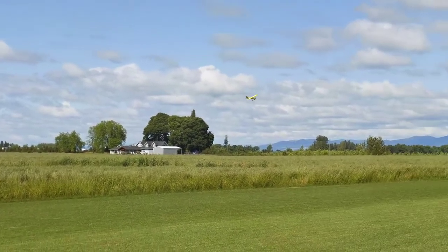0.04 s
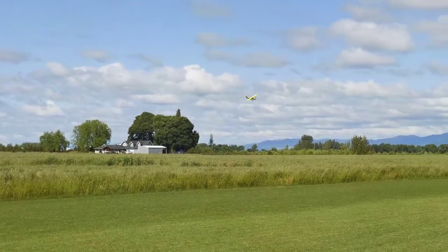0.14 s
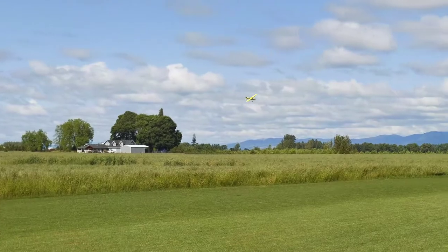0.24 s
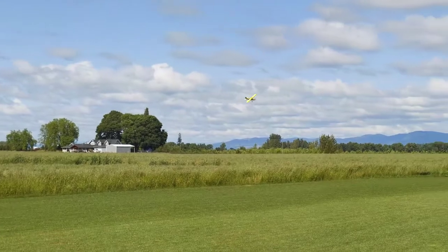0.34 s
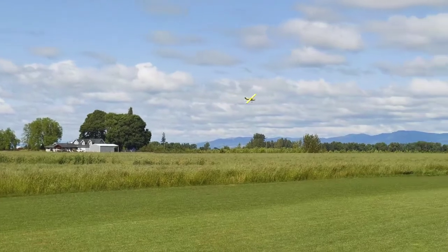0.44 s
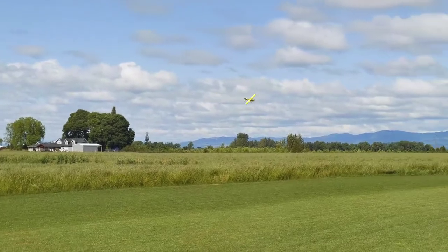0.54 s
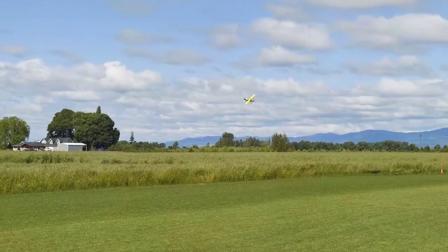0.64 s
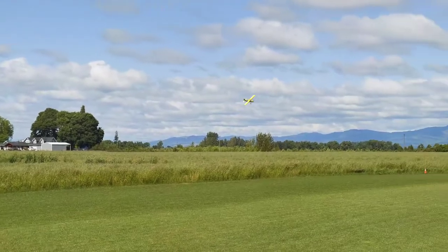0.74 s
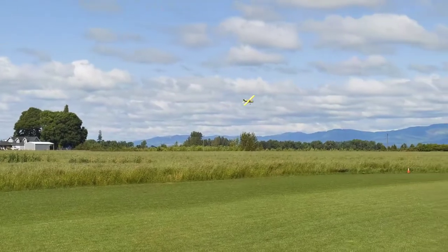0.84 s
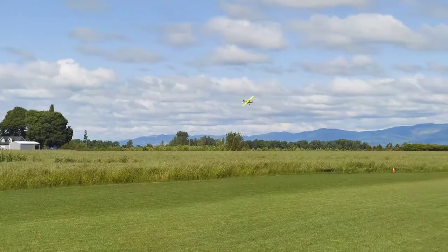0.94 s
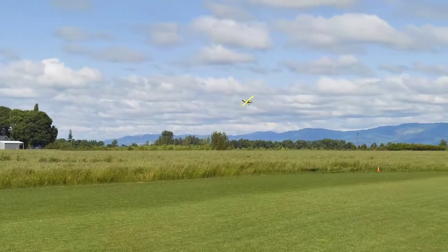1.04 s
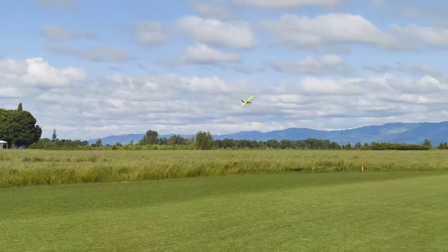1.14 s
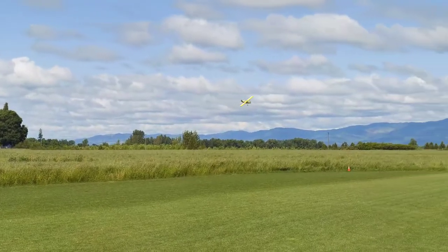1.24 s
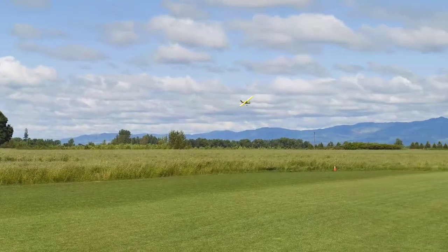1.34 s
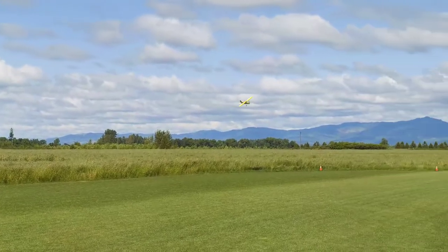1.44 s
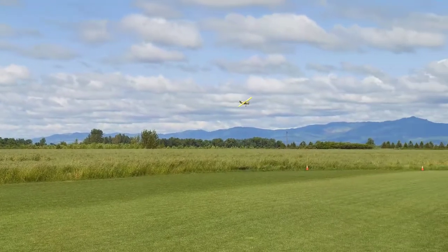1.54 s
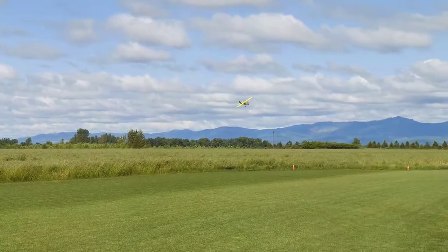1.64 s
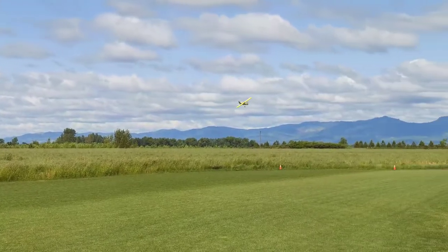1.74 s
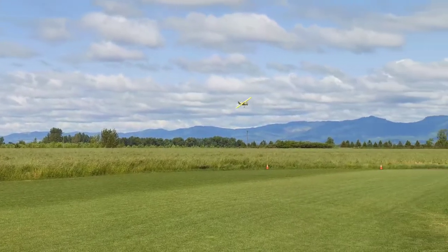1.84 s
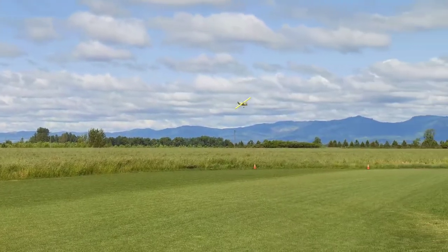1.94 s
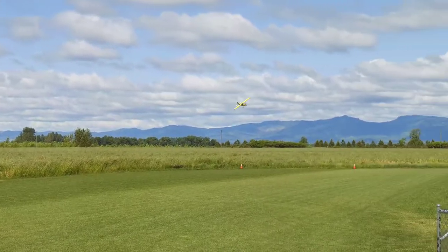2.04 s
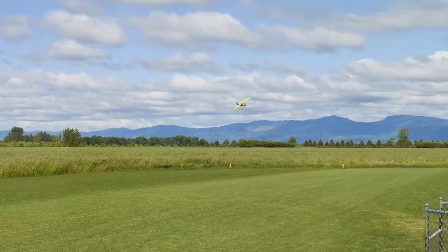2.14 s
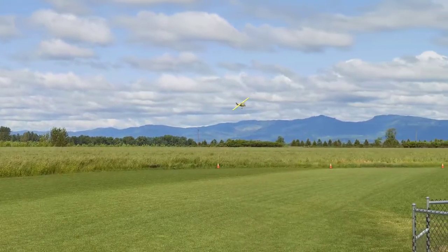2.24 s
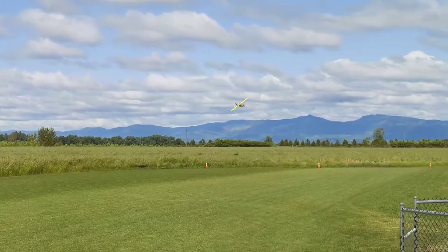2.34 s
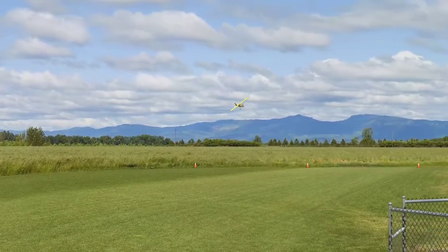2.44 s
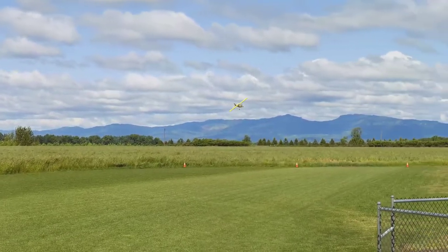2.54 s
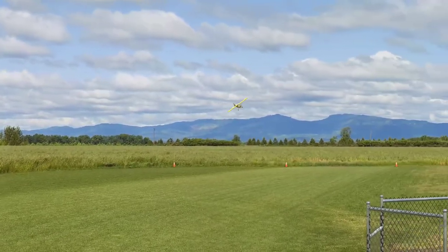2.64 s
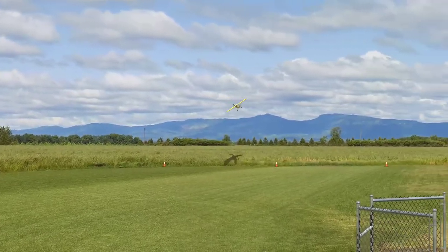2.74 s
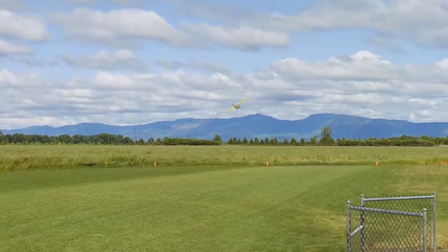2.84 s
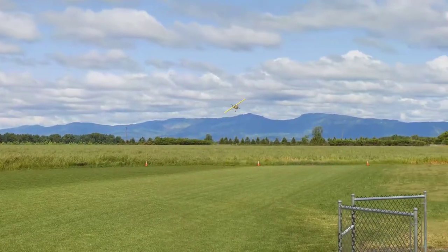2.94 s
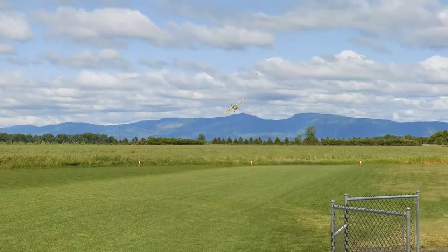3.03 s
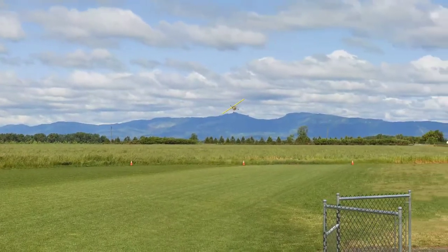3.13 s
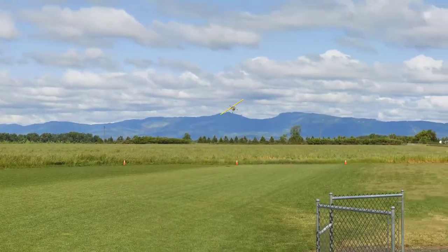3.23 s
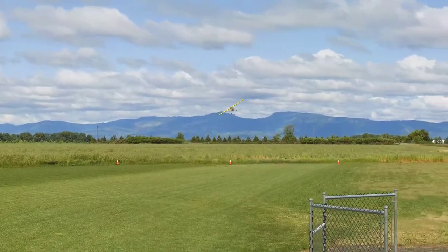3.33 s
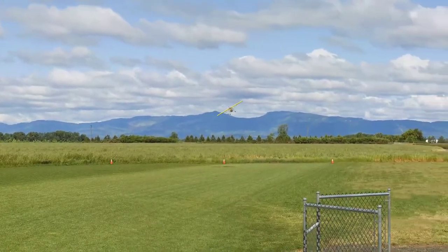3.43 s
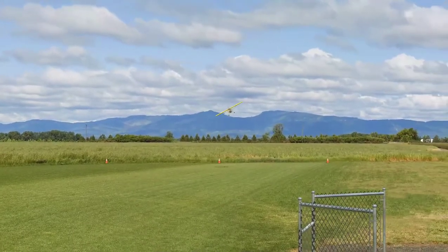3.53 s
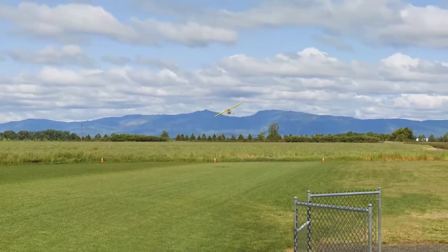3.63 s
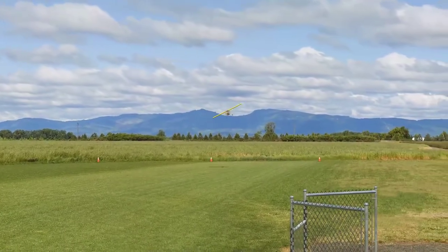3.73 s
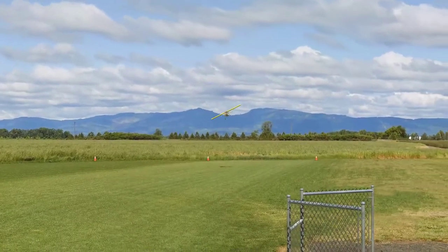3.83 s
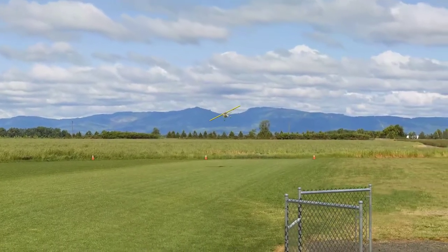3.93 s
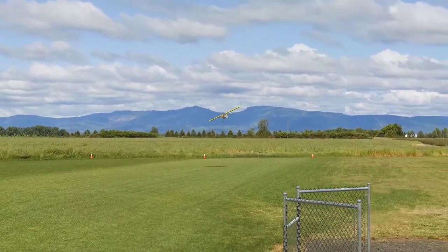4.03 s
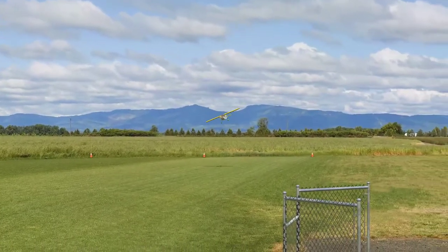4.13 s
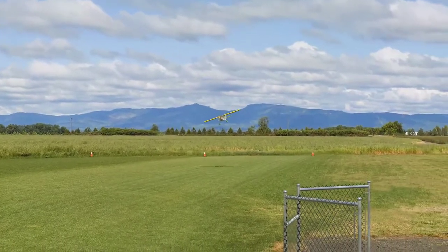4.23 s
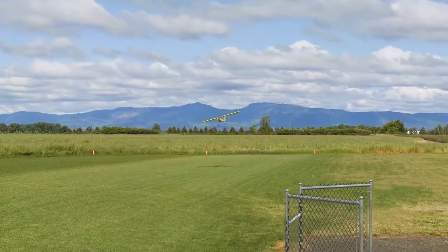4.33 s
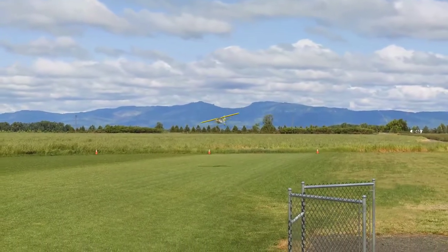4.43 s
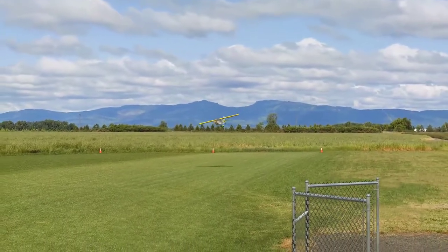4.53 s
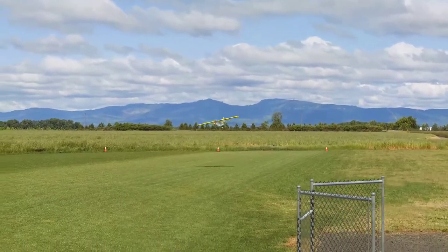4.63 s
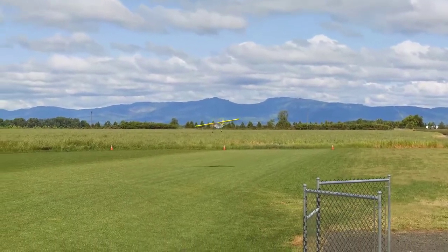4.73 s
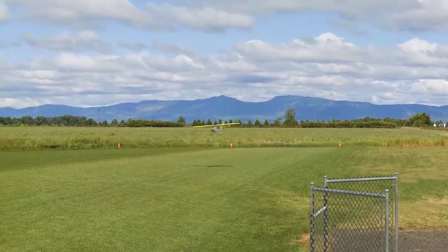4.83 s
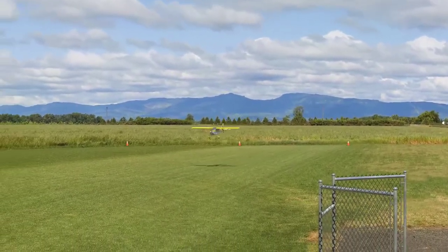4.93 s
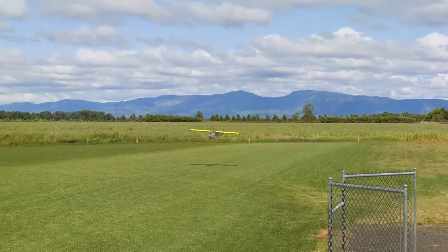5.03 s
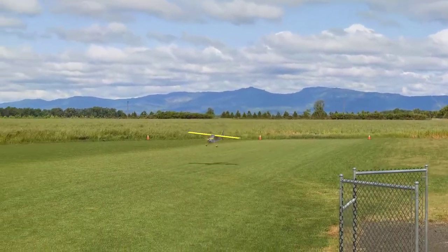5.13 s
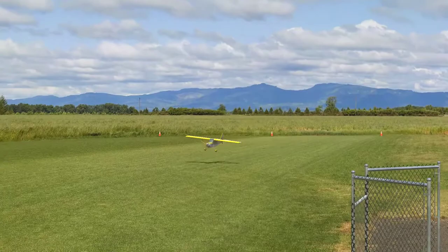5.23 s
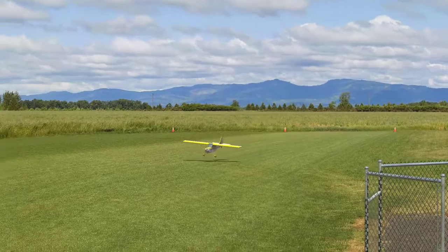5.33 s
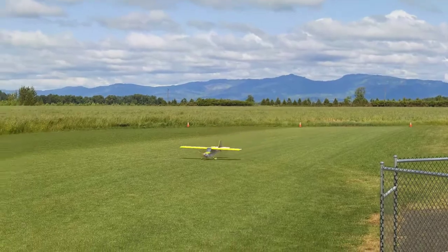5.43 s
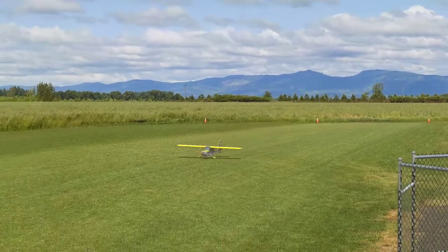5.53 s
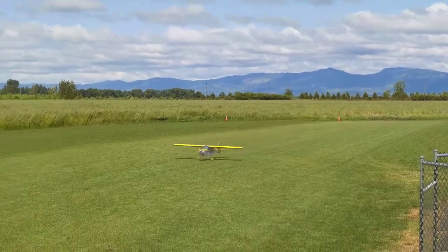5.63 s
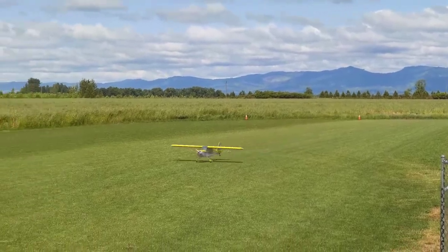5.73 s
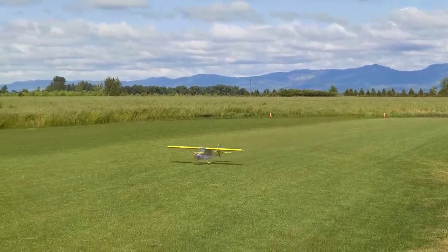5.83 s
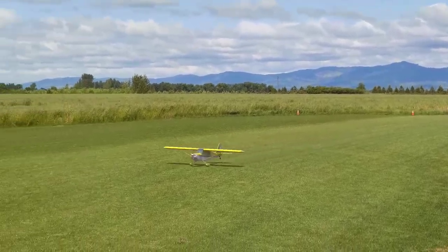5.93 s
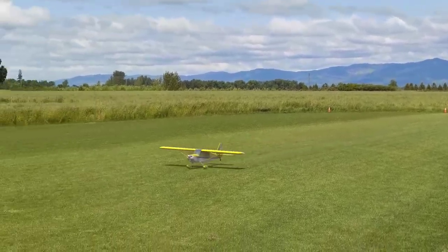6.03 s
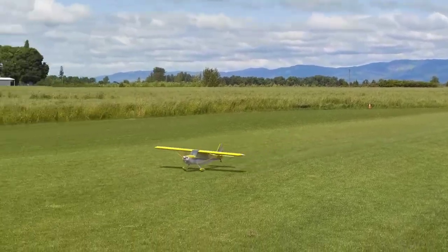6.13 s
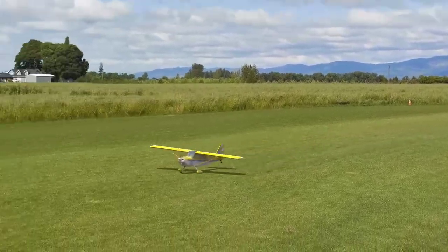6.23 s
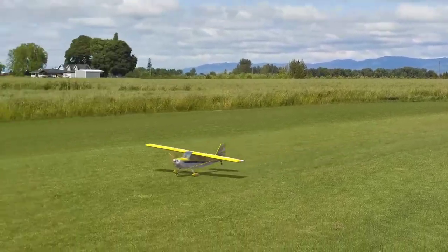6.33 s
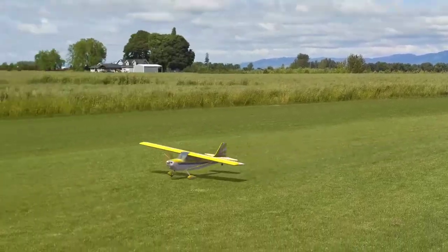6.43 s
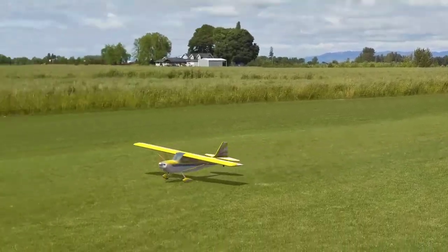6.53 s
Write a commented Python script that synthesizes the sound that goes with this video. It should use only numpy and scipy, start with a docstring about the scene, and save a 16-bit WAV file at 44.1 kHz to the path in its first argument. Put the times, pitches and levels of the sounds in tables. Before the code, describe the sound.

Rapid, hollow exhaust pops with soft intake gulps, faint hiss and ticking valves come from a small plane gliding in to land. The idle sags gently, with weak beats here and there. Near the end it surges abruptly into a firm, bright drone, dips slightly, then rises again as it nears. Open field, light wind, fixed listening position, almost centered sound.

```python
"""A model airplane with a single-cylinder four-stroke engine comes in to land on a grass field in a soft breeze.
First it idles with a throaty putter that slowly slackens; now and then a firing is weak or almost missing.
On touchdown it revs up to taxi closer, and the propeller tones and a rush of air join in.
Exhaust pops, intake gulps, gas hiss and propeller tones all follow the turning crankshaft.
The exhaust levels follow throttle, speed and distance. The field returns a faint echo throughout."""
import sys
import numpy as np
from scipy import signal
from scipy.fft import rfft, irfft, next_fast_len
from scipy.io import wavfile
from scipy.ndimage import uniform_filter1d, map_coordinates

SR = 44100
rng = np.random.default_rng(int(sys.argv[2]) if len(sys.argv) > 2 else 0)


def dump(signal):
    """Clip the signal to [-1, 1] and save it as 16-bit WAV at the path in sys.argv[1]."""
    limited = np.clip(np.atleast_2d(signal).T, -1, 1)
    pcm = np.round(limited * 32767).astype(np.int16)
    wavfile.write(sys.argv[1], SR, pcm)


N = 289716

# Tone colour of escaping gas and of the ticking valves. Each row: frequency in Hz, relative level in dB.
HISS_COLOUR = [(400, -25), (1000, 4), (1650, -0.5), (2000, -7.5), (2500, -1.5), (3200, -6.5), (4300, -2),
               (7000, -8), (9500, -10.5), (11000, -18), (13500, -22.5), (15800, -33)]
# Tone colour of moving air. Each row: frequency in Hz, relative level in dB.
AIR_COLOUR = [(25, -12), (55, -11), (90, 2.5), (160, 9.5), (400, -2), (800, -30), (2000, -46.5),
              (7000, -48.5), (10000, -55), (15000, -76)]


def amp(db):
    """Turn decibels into a gain."""
    return 10 ** (np.asarray(db) / 20)


def unit(x):
    """Scale to an rms of 1."""
    return x / np.sqrt(np.mean(x ** 2) + 1e-20)


def along(points, hz):
    """Read a value between (Hz, value) points on a logarithmic frequency axis."""
    point_hz, values = np.transpose(points)
    return np.interp(np.log(hz + 1), np.log(point_hz + 1), values)


def curves(rows):
    """Join the points of each column after the time into a curve with one value per sample."""
    seconds, *columns = np.transpose(rows)
    return [np.interp(np.arange(N) / SR, seconds, column) for column in columns]


def wobble(rate):
    """Draw a smooth random curve through this many random points a second."""
    points = rng.standard_normal(int(N * rate / SR) + 4)
    return map_coordinates(points, [np.arange(N) * rate / SR])


def filtered(x, response):
    """Multiply the spectrum of x by a function of frequency."""
    size = next_fast_len(N + SR // 2)
    hz = np.fft.rfftfreq(size, 1 / SR)
    return irfft(rfft(x, size) * response(hz), size)[..., :N]


def noise(colour):
    """Make random noise of rms 1 with this tone colour."""
    return unit(filtered(rng.standard_normal(N), lambda hz: amp(along(colour, hz))))


def ringing(colour, size=4096):
    """Make a ring with this tone colour that starts at once and dies away (minimum phase)."""
    cepstrum = irfft(np.log(amp(along(colour, np.fft.rfftfreq(size, 1 / SR)))))
    # folding the second half onto the first leaves nothing before the strike
    cepstrum[1:size // 2] *= 2
    cepstrum[size // 2 + 1:] = 0
    return irfft(np.exp(rfft(cepstrum)))


def strike(at, sizes, response):
    """Sound a response of energy 1 at each given sample, scaled by its size."""
    pulses = np.bincount(at, sizes, N)
    return signal.fftconvolve(pulses, response / np.linalg.norm(response))[:N]


def fade_db(fade):
    """Dip smoothly and briefly in level, following a bell curve."""
    middle_s, half_length_s, depth_db = fade
    return depth_db * np.exp(-((np.arange(N) / SR - middle_s) / half_length_s) ** 2)


def breeze():
    """Soft moving air, a noise whose level wanders gently."""
    return amp(-35 + wobble(3.4)) * noise(AIR_COLOUR)


def propeller_wash(throttle):
    """Turbulent air behind the propeller, a noise that grows with the throttle."""
    return amp(-32) * throttle * noise(AIR_COLOUR)


def field(x, echo_s, echo_db):
    """One distant echo and a little diffuse scatter, dulled by the grass, join the direct sound."""
    # How long scattered sound lasts. Each row: frequency in Hz, time to fall by 60 dB in seconds.
    fall_times = [(150, 0.31), (1000, 0.12), (8000, 0.085)]
    scatter_db, absorb_hz = -18, 900
    hz, t, bands = signal.stft(rng.standard_normal(SR // 2), SR, nperseg=256)
    decay = amp(-60 * t / along(fall_times, hz)[:, None])
    tail = signal.istft(bands * decay, SR, nperseg=256)[1]
    scatter = signal.fftconvolve(x, tail / np.linalg.norm(tail))[:N]
    dull_scatter = filtered(scatter, lambda f: 1 / (1 + 1j * f / absorb_hz))
    echo = np.pad(x, (int(abs(echo_s) * SR), 0))[:N]
    return x + amp(echo_db) * echo + amp(scatter_db) * dull_scatter


def crank(rate, flutter):
    """Count engine cycles by adding up the speed; each whole number is an exhaust stroke."""
    # Moments when the beat jumps ahead. Each row: time in seconds, jump as a share of a cycle.
    jumps = [(1.42, .33), (2.37, .25), (3.56, .25), (4.77, .23)]
    start = .072  # cycles
    ahead = sum(share * (np.arange(N) / SR > s) for s, share in jumps)
    smooth_ahead = uniform_filter1d(ahead, size=1800)
    return start + np.cumsum(rate) / SR + smooth_ahead + flutter * wobble(14)


def propeller(cycle, throttle, lag, growth):
    """Clean low tones at multiples of the shaft speed; they swell steeply with the throttle."""
    # Peak levels in dB at full throttle, of the tones at 1 and 2 times the shaft speed.
    tone_levels = [-12.5, -28]
    # One brief dip of the lower tone: middle in seconds, half length in seconds, depth in dB.
    low_tone_fade = (6.31, 0.077, -16)
    shaft_db, blade_db = tone_levels
    angle = 4 * np.pi * (cycle - lag)  # the shaft turns twice per engine cycle
    shaft_tone = amp(shaft_db + fade_db(low_tone_fade)) * np.cos(angle)
    blade_tone = amp(blade_db) * np.cos(2 * angle)
    return throttle ** growth * (shaft_tone + blade_tone)


def level_db(law, rate, throttle):
    """A layer's level follows throttle, nearness and idle speed, and how hard the engine pulls to speed up."""
    # The airplane flies off, turns and comes in. Each row: time in seconds, distance in metres.
    distances = [(0, 45.5), (1.6, 60.4), (2.4, 55.5), (3.9, 30.3), (5.2, 26.6), (5.8, 22.5), (6.57, 13.3)]
    reference_m, idle_rate = 30, 40  # metres, firings per second
    pull_rate = 69  # speeding up this fast, in firings per second each second, is a hard pull
    idle_db, power_db, near_db, speed_db, pull_db = law
    nearness = np.log2(reference_m / curves(distances)[0])
    speeding_up = uniform_filter1d(np.gradient(rate) * SR, size=3500)
    pull = np.tanh(speeding_up / pull_rate)
    idle = idle_db + speed_db * np.log2(rate / idle_rate)
    return (1 - throttle) * idle + throttle * power_db + near_db * nearness + pull_db * pull


def clatter():
    """Loose valve gear: uneven ticks at random times set off bursts of noise that die away and overlap."""
    # In order: ticks per second, level in dB against the hiss bursts, spread in dB, decay time in seconds.
    ticking = (42.5, -11, 4.5, 0.32)
    per_s, level, spread_db, decay_s = ticking
    ticks = (rng.random(N) < per_s / SR) * amp(spread_db * rng.standard_normal(N))
    gate = signal.lfilter([1], [1, -np.exp(-1 / (decay_s * SR))], ticks)
    return amp(level) * unit(gate) * noise(HISS_COLOUR)


def gas_jet(cycle, rate, throttle, lead_s, rise_s, repeat):
    """Hiss bursts out as the exhaust valve cracks open; under load each burst is partly like the last."""
    blowdown_s = .0021
    age_s = (cycle + lead_s * rate) % 1 / rate  # time since the valve opened
    gate = (1 - np.exp(-age_s / rise_s)) ** 3 * np.exp(-age_s / blowdown_s)
    same_share = np.clip(repeat * throttle, 0, 1)
    # reading the same noise from its start in every cycle makes the bursts alike
    rasp = np.interp(age_s * SR, np.arange(N), noise(HISS_COLOUR))
    mixed_hiss = np.sqrt(1 - same_share) * noise(HISS_COLOUR) + np.sqrt(same_share) * rasp
    burst = unit(gate / np.sqrt(rate)) * mixed_hiss
    leak_db = -15.75 * (1 - throttle) - 8.25 * throttle  # steady hiss at idle and at full throttle
    return burst, amp(leak_db) * noise(HISS_COLOUR)


def intake(at, sizes, rate):
    """Part of a cycle after each idle pop the cylinder draws air: a short, rounded gulp."""
    gulp_hz, width_s, gulp_db = 190.4, 0.0056, -3.5
    after_pop, delay_s = .27, .015  # share of a cycle, then seconds to the middle of the gulp
    t = np.arange(SR // 16) / SR - delay_s
    gulp = -np.exp(-(t / width_s) ** 2) * np.cos(2 * np.pi * gulp_hz * t)
    gulp_at = at + (after_pop * SR / rate[at]).astype(int)
    return strike(gulp_at, sizes * amp(gulp_db), gulp)


def firings(cycle, throttle, idle_scatter_db, power_scatter_db):
    """Find the sample and strength in dB of each firing; burning is uneven at idle and firm under load."""
    # Weak or nearly missed firings. Each row: time in seconds, change of strength in dB.
    misfires = [(.592, -6), (.637, -8), (.681, -5), (.934, -9), (1.051, -8), (2.123, -7), (2.531, -5),
                (2.711, -11), (2.814, -13), (3.024, -5), (3.265, -6), (3.7, -6), (3.891, -11), (4.001, -13),
                (4.222, -6), (5.134, -11)]
    at = np.flatnonzero(np.diff(np.floor(cycle)) > 0)
    scatter_db = idle_scatter_db * (1 - throttle[at]) + power_scatter_db * throttle[at]
    strength_db = rng.standard_normal(len(at)) * scatter_db
    for s, drop_db in misfires:
        nearest = np.argmin(abs(at / SR - s))
        strength_db[nearest] += drop_db
    return at, strength_db


def muffler_pop(start_hz, end_hz, fall_s, rise_s, decay_s):
    """One idle pop: the muffler's ring sinks in pitch as the burst of gas drains away."""
    t = np.arange(SR // 16) / SR
    hz = end_hz + (start_hz - end_hz) * np.exp(-(t / fall_s) ** 2)
    swell = (1 - np.exp(-t / rise_s)) ** 2 * np.exp(-t / decay_s)
    return swell * np.sin(2 * np.pi * np.cumsum(hz) / SR)


def idle_crack(at, sizes):
    """The pipe's ring after each idle firing, its resonances drifting together in pitch."""
    # Tone colour of the ring. Each row: frequency in Hz, relative level in dB.
    ring_colour = [(300, 1.5), (500, -4), (680, 7.5), (830, -7), (1000, 4.5), (1200, -11.5), (1620, -2.5),
                   (1950, -21), (2450, -9.5), (3100, -19.5), (4300, -11.5), (8000, -52), (14000, -66.5)]
    # Drift of the pitch. Each row: time in seconds, pitch ratio.
    pitch_drift = [(0, 1), (1.4, 0.98), (2.3, .88), (3, 1.01), (5.2, 0.99)]
    # the ring is played back along a clock that runs faster or slower
    clock = np.cumsum(curves(pitch_drift)[0])
    starts = np.minimum(clock[at].astype(int), N - 1)
    return np.interp(clock, np.arange(N), strike(starts, sizes, ringing(ring_colour)))


def pipe(x):
    """In the pipe the lows trail the highs by a few of their own cycles, so every crack sweeps downward."""
    sweep = 3.5  # each frequency is late by sweep / (hz + 400) seconds
    return filtered(x, lambda hz: np.exp(-2j * np.pi * sweep * np.log(hz + 400)))


def exhaust(cycle, rate, throttle):
    """Each firing booms in the muffler, cracks in the pipe and puffs hiss; at idle the intake answers."""
    # Level rules for boom, crack and gas hiss, before the trims below. Each lists: idle level in dB,
    # full throttle level in dB, dB per halving of distance, dB per octave of idle speed, dB for a hard pull.
    boom_law = (-28, -19, 3, -2.5, 0.5)
    crack_law = (-52.5, -34, 6, 17.5, 1.2)
    gas_law = (-59, -45, 7.5, -1, 2)
    # Tone colours of boom and crack under load. Each row: frequency in Hz, relative level in dB.
    power_boom_colour = [(40, -61.5), (90, -22.5), (170, -1), (255, 4.5), (340, 0), (425, 0.5), (550, -6.5),
                         (700, -10), (800, -19), (950, -46), (1500, -67.5), (6000, -98.5)]
    power_crack_colour = [(500, -27.5), (800, -5), (1020, 6.5), (1300, -2.5), (1720, 0.5), (1900, -11),
                          (2130, -12), (2340, 1), (2580, -3), (2950, -27), (3600, -21), (4500, -15),
                          (9000, -20.5), (15000, -57)]
    # One brief dip of the boom while taxiing: middle in seconds, half length in seconds, depth in dB.
    boom_fade = (5.66, 0.17, -4.5)
    boom_db, crack_db, hiss_db = [level_db(law, rate, throttle) for law in (boom_law, crack_law, gas_law)]
    at, db = firings(cycle, throttle, idle_scatter_db=1.4, power_scatter_db=.35)
    spacing = np.sqrt(SR / rate[at])  # evens out the loudness at any firing rate
    idle = spacing * np.sqrt(1 - throttle[at])
    power = spacing * np.sqrt(throttle[at])

    pop = muffler_pop(start_hz=408.6, end_hz=141.7, fall_s=0.00735, rise_s=0.17, decay_s=0.0039)
    # a weak firing loses more of its crack than of its boom
    putter = strike(at, idle * amp(0.83 * db), pop) + intake(at, idle, rate)
    power_boom = strike(at, power * amp(db - 5.0), ringing(power_boom_colour))
    boom = amp(2.5) * putter + pipe(power_boom)

    power_crack = strike(at, power * throttle[at] * amp(db - 3.5), ringing(power_crack_colour))
    crack = pipe(idle_crack(at, idle * amp(db + 0.5)) + power_crack)

    burst, leak = gas_jet(cycle, rate, throttle, lead_s=.0015, rise_s=0.00057, repeat=0.46)
    strength = amp(np.interp(np.arange(N), at, db))
    hiss = strength * burst + leak + clatter()
    return amp(boom_db + fade_db(boom_fade)) * boom + amp(crack_db) * crack + amp(hiss_db + 3.5) * hiss


def scene():
    """Play the airplane over a soft breeze, almost mono."""
    # Engine speed. Each row: time in seconds, firings per second.
    engine_speed = [(0, 46.12), (.63, 44.84), (.94, 42.37), (1.12, 43.46), (1.94, 40.7), (2.13, 38.49),
                    (2.84, 38.69), (3.37, 36.19), (4.07, 36.52), (4.61, 34.26), (5.2, 35.17), (5.29, 44.8),
                    (5.41, 78), (5.5, 90), (5.68, 91.2), (5.77, 85.2), (6.11, 79.9), (6.32, 85),
                    (6.57, 95.9)]
    # Throttle opening. Each row: time in seconds, throttle from 0 to 1.
    throttle_moves = [(5.2, 0.01), (5.3, 0.32), (5.41, 0.99)]
    rate, = curves(engine_speed)
    throttle = np.clip(curves(throttle_moves)[0], 0, 1)
    cycle = crank(rate, flutter=0.004)
    plane = exhaust(cycle, rate, throttle) + propeller(cycle, throttle, lag=0.024, growth=3.5)
    outdoors = field(plane, echo_s=0.22, echo_db=-22)
    left_right_db = [[-.1], [.1]]
    return (outdoors + breeze() + propeller_wash(throttle)) * amp(left_right_db)


def record(dry):
    """The microphone's wind filter thins the deep bass; nothing is kept above the band limit."""
    low_cut_hz, top_hz = 75, 15850
    return filtered(dry, lambda hz: (hz < top_hz) * hz ** 3 / np.sqrt(hz ** 6 + low_cut_hz ** 6))


dry = scene()
out = record(dry)
dump(out)
```